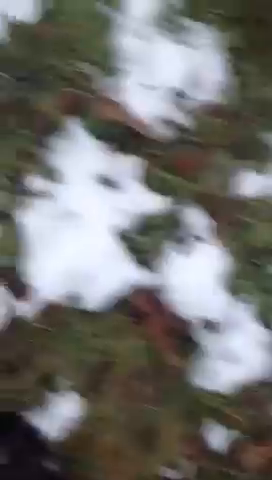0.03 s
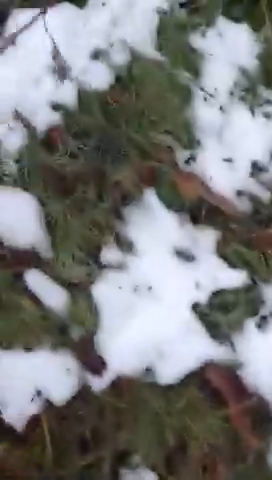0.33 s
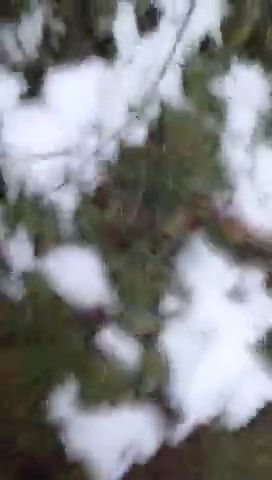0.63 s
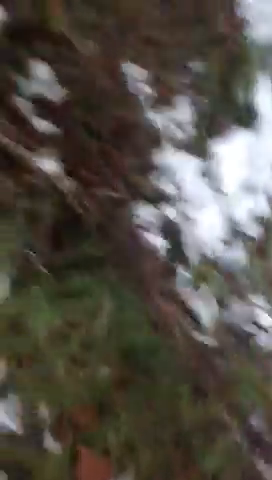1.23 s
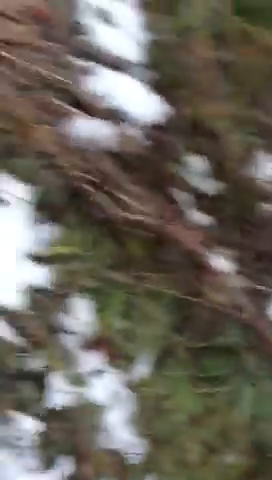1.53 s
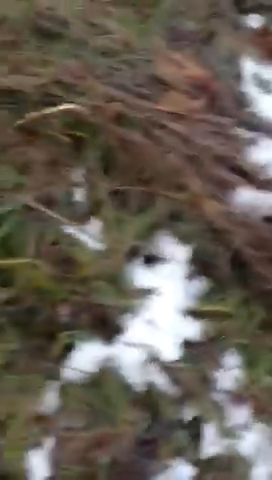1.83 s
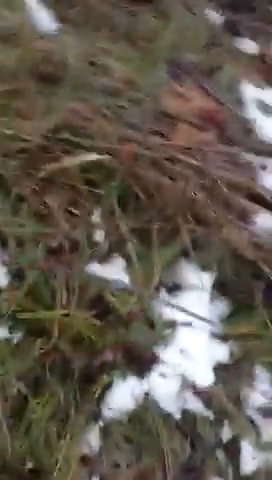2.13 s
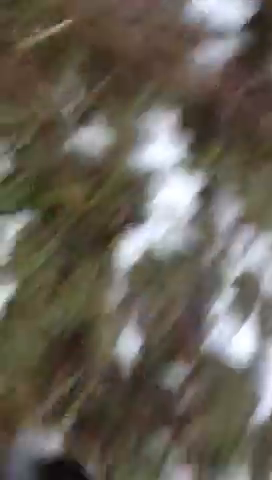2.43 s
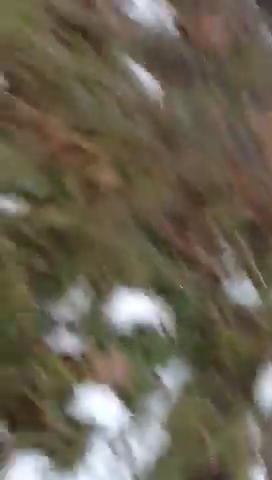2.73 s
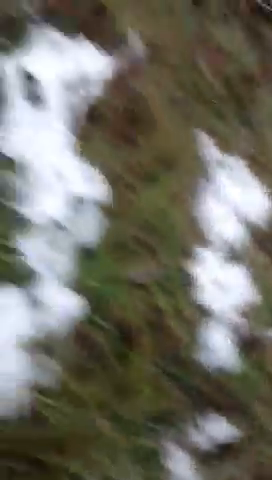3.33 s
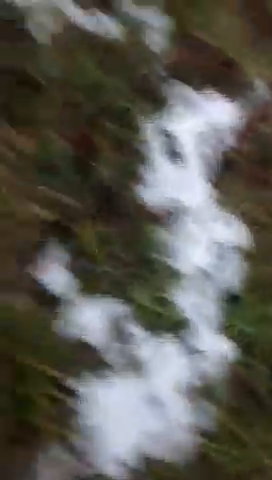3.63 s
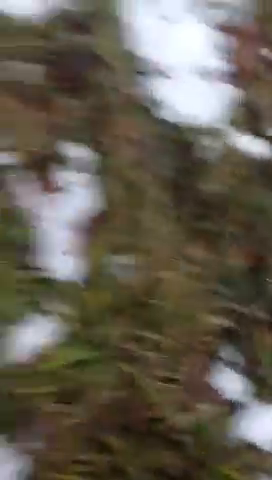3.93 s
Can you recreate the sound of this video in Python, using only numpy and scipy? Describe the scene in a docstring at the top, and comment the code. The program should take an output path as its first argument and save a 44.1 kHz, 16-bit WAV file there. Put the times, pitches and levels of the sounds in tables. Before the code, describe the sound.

Footsteps swish and crunch through dry grass and thin snow, with low wind gusts.

```python
"""A field of dry grass, dead leaves and thin wet snow, heard close on a walker's hand-held microphone.
Boots sweep the blades and crush the mat below; stems snap, a foot thuds on soft ground,
the sole grinds packed snow and clumps give way in hollow pops.
Air buffets the microphone in short low gusts; far off lies a steady hush with a faint drone in it."""
import sys
import numpy as np
from scipy import signal
from scipy.fft import rfft, irfft
from scipy.io import wavfile
from scipy.ndimage import uniform_filter1d

SR = 44100
rng = np.random.default_rng(int(sys.argv[2]) if len(sys.argv) > 2 else 0)


def generate_wav(signal):
    """Clip the signal to [-1, 1] and save it as 16-bit WAV at the path in sys.argv[1]."""
    frames = np.transpose(np.atleast_2d(signal))
    scaled = np.clip(frames, -1, 1) * 32767
    pcm = np.round(scaled).astype(np.int16)
    wavfile.write(sys.argv[1], SR, pcm)


N = 176400
TIME = np.arange(N) / SR


def from_db(db):
    """Decibels to gain."""
    return 10 ** (np.asarray(db) / 20)


def rms_one(x):
    """Scale to unit power."""
    return x / np.sqrt(np.mean(x ** 2) + 1e-20)


def band(x, low_hz, high_hz):
    """Causal band-pass."""
    sos = signal.butter(2, [low_hz, min(high_hz, SR / 2 - 100)], "band", fs=SR, output="sos")
    return signal.sosfilt(sos, x + 1e-18)


def at_hz(spectrum, hz):
    """Gain of a spectrum (f/Hz, level/dB), read on a log-frequency axis."""
    points_hz, points_db = np.array(spectrum).T
    return from_db(np.interp(np.log(hz), np.log(points_hz), points_db))


def noise(spectrum):
    """Smooth noise of a given colour, unit power."""
    hz = np.maximum(np.arange(N // 2 + 1) * SR / N, 1)
    return rms_one(irfft(rfft(rng.standard_normal(N)) * at_hz(spectrum, hz), N))


def drift(rate_hz):
    """Random wander with spread 1, mostly slower than rate_hz."""
    hz = np.arange(N // 2 + 1) * SR / N
    return rms_one(irfft(rfft(rng.standard_normal(N)) * (hz > 0) / (1 + (hz / rate_hz) ** 2), N))


def swells(rows):
    """Joint gain of swells (peak t/s, rise/ms, fall/ms, level/dB); rise and fall span 10 dB."""
    shape = 1.38  # 1 = pointed, 2 = bell
    power = 0
    for s, rise_ms, fall_ms, db in rows:
        ms = (TIME - s) * 1000
        away = np.maximum(-ms / rise_ms, ms / fall_ms)
        power += from_db(db - 10 * np.minimum(away, 20) ** shape) ** 2
    return np.sqrt(power)


def grains(spectrum, per_s, spread_db, hiss):
    """Tiny uneven fractures, each ringing in one band or across all, over friction hiss; unit power."""
    def clicks():
        sizes = from_db(spread_db * np.minimum(rng.exponential(1, N), 5))
        return rms_one((rng.random(N) < per_s / SR) * sizes)
    edges_hz = np.geomspace(120, 17000, 13)
    shared, out = clicks(), 0
    for low, high in zip(edges_hz, edges_hz[1:]):
        broad = shared * rng.standard_normal(N)
        narrow = clicks() * rng.choice([-1, 1], N)
        friction = hiss * rng.standard_normal(N)
        out += at_hz(spectrum, np.sqrt(low * high)) * band(broad + narrow + friction, low, high)
    return rms_one(out)


def add_fracture(out, s, db, low_hz, high_hz, decay_s):
    """An abrupt burst with a faint tail of splinters; db is its level were all its energy in 1 ms."""
    t = TIME[:SR // 20]
    splinters = from_db(-19.5) * np.exp(-t / .0043)
    envelope = np.exp(-t / decay_s) + splinters
    burst = band(rng.choice([-1, 1], len(t)) * envelope, low_hz, high_hz)
    burst *= np.sqrt(.001 * SR / np.sum(burst ** 2))
    start = int(s * SR)
    out[start:start + len(t)] += from_db(db) * burst[:N - start]


def evened(x):
    """Even out the slow swings of low noise, so that each push has its own strength."""
    return x / np.sqrt(uniform_filter1d(x ** 2, size=1100) + 1e-2 * np.mean(x ** 2))


def far_hush():
    """The distant hush of the outdoors, wavering slightly in level."""
    # colour of the hush: f/Hz, level/dB
    spectrum = [(25, -32), (50, -6), (70, -15), (92, 1.5), (130, -5), (250, -4), (380, -3.5), (500, -2.5),
                (660, -3), (820, -1), (1000, -2.5), (1400, -8.5), (2200, -16), (4000, -21.5), (8000, -20.5),
                (15000, -16.5)]
    return from_db(-46 + 1.3 * drift(rate_hz=1.1)) * noise(spectrum)


def far_drone():
    """A faint far-off tone within the hush, unsteady in pitch and level."""
    hz = 550.3 * (1 + .0057 * drift(rate_hz=7.6))
    tone = np.sin(2 * np.pi * np.cumsum(hz) / SR)
    swing = from_db(3 * drift(rate_hz=1.8))
    return from_db(-61.5) * rms_one(tone * swing)


def grass():
    """Each boot stroke brushes the blades brightly and crushes the duller mat of leaves and snow."""
    # boot strokes: peak t/s, rise/ms, fall/ms, blade level/dB, mat level/dB
    strokes = [(.08, 120, 230, -46.5, -48), (.25, 35, 48, -47, -48.5), (0.45, 40, 42, -28.5, -37),
               (.635, 143, 250, -36, -43.5), (.85, 50, 47, -42, -53), (.975, 120, 80, -42, -63),
               (1.109, 6.9, 11, -40.5, -44), (1.2, 19, 22, -38, -62), (1.293, 52, 51, -25, -35),
               (1.435, 42, 50, -33.5, -40), (1.535, 69, 80, -31.5, -39), (1.65, 44, 77, -35, -45.5),
               (1.872, 89, 88, -32.5, -48.5), (2.01, 8.4, 11, -52, -47.5), (2.114, 64, 42, -38, -60),
               (2.186, 35, 15, -24.5, -44), (2.253, 55, 81, -30.5, -34), (2.48, 115, 76, -34.5, -48),
               (2.705, 45, 63, -42, -50), (2.807, 22, 94, -27.5, -37.5), (2.964, 37, 43, -28.5, -35.5),
               (3.1, 88, 76, -40.5, -51.5), (3.24, 93, 25, -42, -48), (3.345, 40, 69, -32.5, -50),
               (3.47, 173, 170, -28.5, -46.5), (3.691, 69, 110, -31.5, -43), (3.775, 83, 106, -33.5, -44.5),
               (3.865, 57, 48, -39.5, -44)]
    # colour of brushed blades: f/Hz, level/dB
    blade_spectrum = [(400, -38), (1500, -39), (2500, -13.5), (4000, -13.5), (5700, -10.5), (8000, -5),
                      (11000, -1.5), (15000, -1)]
    # colour of the crushed mat: f/Hz, level/dB
    mat_spectrum = [(100, -35), (250, 0), (700, -1.5), (1400, -1), (2100, -4), (3300, -5.5), (5000, 3),
                    (8000, -7.5), (15000, -8)]
    sweep = swells([(s, rise, fall, db) for s, rise, fall, db, _ in strokes])
    sweep *= from_db(1.7 * drift(rate_hz=50))  # flutter
    press = swells([(s, rise, fall, db) for s, rise, fall, _, db in strokes])
    press *= from_db(2.6 * drift(rate_hz=70))
    blades = sweep * grains(blade_spectrum, per_s=9000, spread_db=2.5, hiss=.49)
    mat = press * grains(mat_spectrum, per_s=2500, spread_db=3.5, hiss=.5)
    # trodden grass springs back: a faint constant crackle, heard between strokes
    settling = from_db(-50) * grains(blade_spectrum, per_s=820, spread_db=5, hiss=.49)
    return blades + mat + settling


def stem_snaps():
    """Single dry stems and leaves break with a bright tick and a woody crack."""
    # snaps: t/s, tick level/dB, crack level/dB
    snaps = [(.021, -39, -42), (.1372, -32, -48), (.1845, -29.5, -37), (0.375, -29, -37),
             (0.4017, -28, -38), (.446, -25, -31), (0.495, -30, -48), (.5454, -14.5, -31),
             (0.5652, -23, -41), (0.6738, -20, -24), (0.68, -21, -28), (.7328, -35, -44), (1.246, -22, -37),
             (1.26, -12, -27.5), (1.339, -27, -31), (1.415, -33, -37), (1.439, -21, -25.5),
             (1.555, -22, -27), (1.6217, -32, -33), (1.7857, -26.5, -37), (1.8086, -36, -39),
             (2.1037, -34, -37), (2.1128, -30, -33), (2.2036, -24, -28.5), (2.2653, -25, -42),
             (2.2723, -35, -26), (2.5387, -26, -34.5), (2.567, -45, -56), (2.6823, -34, -41),
             (2.7932, -12, -33), (2.8486, -18, -35), (2.8545, -24, -32), (2.8785, -24, -28.5),
             (2.979, -24, -36), (3.003, -41, -42), (3.0187, -39, -30.5), (3.0906, -34, -32),
             (3.1013, -29, -39), (3.22, -32, -32), (3.3446, -28, -42), (3.6, -32, -27), (3.6089, -31, -35),
             (3.641, -36, -30.5), (3.7285, -21.5, -34), (3.764, -20.5, -28.5), (3.779, -26, -39)]
    out = np.zeros(N)
    for s, tick_db, crack_db in snaps:
        add_fracture(out, s, tick_db, low_hz=10040, high_hz=16600, decay_s=.00022)
        add_fracture(out, s, crack_db, low_hz=2480, high_hz=7100, decay_s=.00022)
    return out


def foot_thuds():
    """A foot presses on soft ground with a short dull thud."""
    # footfalls: t/s, level/dB
    thuds = [(0.073, -39), (0.275, -39.5), (2.806, -31.5), (2.975, -35.5)]
    rise_ms, fall_ms = 2.3, 26
    weight = swells([(s, rise_ms, fall_ms, db) for s, db in thuds])
    return weight * evened(band(rng.standard_normal(N), low_hz=158, high_hz=377))


def wind_on_microphone():
    """Air buffets the microphone in short low gusts."""
    # gusts: peak t/s, rise/ms, fall/ms, level/dB
    gusts = [(.09, 25, 68, -56), (.785, 28, 40, -33.5), (.83, 90, 75, -42), (.927, 12, 29, -37),
             (.992, 20, 33, -38), (1.27, 24, 27, -55), (1.4, 12, 18, -43), (2.32, 48, 41, -34),
             (2.425, 52, 30, -26), (2.457, 14.5, 5.7, -23.5), (2.492, 17, 47, -30.5), (2.615, 12, 28, -43),
             (3.12, 185, 100, -51.5), (3.275, 74, 50, -40), (3.375, 14, 16, -42), (3.586, 10, 11, -47),
             (3.867, 38, 40, -30.5), (3.952, 8, 7, -24.5), (3.99, 120, 40, -34.5)]
    # colour of the buffeting: f/Hz, level/dB
    spectrum = [(30, -36), (60, -19), (100, -9), (145, -1.5), (200, 1), (275, -4), (380, -14.5),
                (600, -24.5), (1200, -42), (4000, -70)]
    return swells(gusts) * evened(noise(spectrum))


def sole_grinding():
    """The sole grinds packed snow and stalks: dense uneven slips ring in one broad resonance."""
    # grinds under load: peak t/s, rise/ms, fall/ms, level/dB, resonance f/Hz
    grinds = [(.45, 12, 28, -36, 4450), (.622, 16, 24, -40.5, 4570), (1.302, 22, 18, -37.5, 4400),
              (2.26, 24, 42, -49, 2600), (2.808, 12, 30, -42, 1740), (2.825, 25, 28, -40.5, 2820),
              (2.828, 25, 39, -38.5, 417), (3.69, 51, 104, -38.5, 3550), (3.77, 70, 47, -45, 550)]
    slips_per_s, spread_db, edge_ratio = 2800, 5, 1.28
    out = np.zeros(N)
    for s, rise_ms, fall_ms, db, hz in grinds:
        sizes = from_db(spread_db * np.minimum(rng.exponential(1, N), 4))
        slips = sizes * rng.choice([-1, 1], N) * (rng.random(N) < slips_per_s / SR)
        ringing = rms_one(band(slips, hz / edge_ratio, hz * edge_ratio))
        out += swells([(s, rise_ms, fall_ms, db)]) * ringing
    return out


def snow_crunches():
    """Clumps of snow and buried twigs give way underfoot in hollow pops that ring a few cycles."""
    # collapses: t/s, level/dB, f/Hz
    crunches = [(.5455, -33, 1330), (1.439, -26.5, 790), (1.4565, -32, 1290), (1.5545, -35.5, 1100),
                (1.6217, -34.5, 1080), (1.758, -37.5, 1000), (1.821, -30, 463), (1.852, -32, 1110),
                (1.909, -27, 5300), (2.245, -41, 527), (2.46, -40, 570), (2.8035, -17.5, 1770),
                (2.8075, -29, 450), (2.8102, -22, 1720), (2.8158, -27, 2680), (2.8305, -30, 2560),
                (2.8325, -25.5, 436), (2.839, -27, 2180), (2.842, -36, 2700), (2.8545, -29.5, 890),
                (2.857, -30.5, 690), (2.9732, -30.5, 1320), (3.018, -34.5, 1260), (3.7643, -26.5, 2640)]
    decay_cycles, edge_ratio = 2.2, 1.37
    out = np.zeros(N)
    for s, db, hz in crunches:
        add_fracture(out, s, db, hz / edge_ratio, hz * edge_ratio, decay_s=decay_cycles / hz)
    return out


def scene():
    """Close steps, far background and wind, as they reach the one microphone."""
    steps = grass() + sole_grinding() + stem_snaps() + snow_crunches() + foot_thuds()
    background = far_hush() + far_drone()
    return (steps + background + wind_on_microphone())[None]


def record(dry):
    """The microphone passes no deep bass, and the top is cut steeply."""
    low_cut_hz, high_cut_hz = 75, 15350
    low_cut = signal.butter(3, low_cut_hz, "high", fs=SR, output="sos")
    high_cut = signal.ellip(12, .2, 70, high_cut_hz, fs=SR, output="sos")
    return signal.sosfilt(high_cut, signal.sosfilt(low_cut, dry))


dry = scene()
out = record(dry)
generate_wav(out)
```